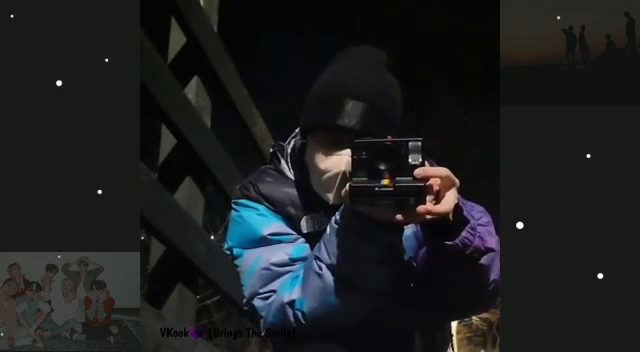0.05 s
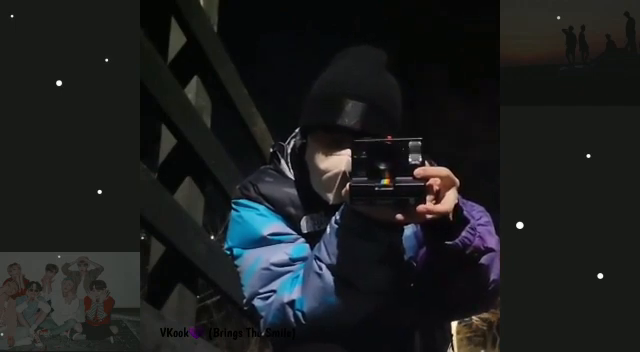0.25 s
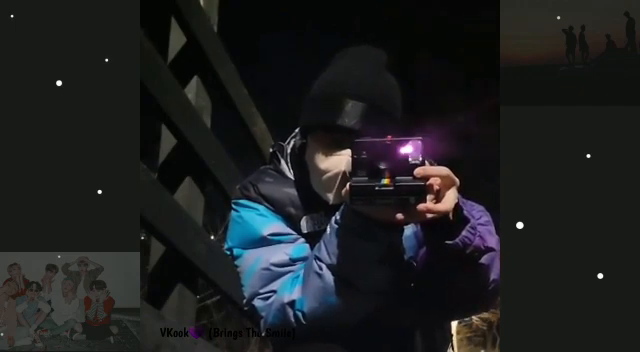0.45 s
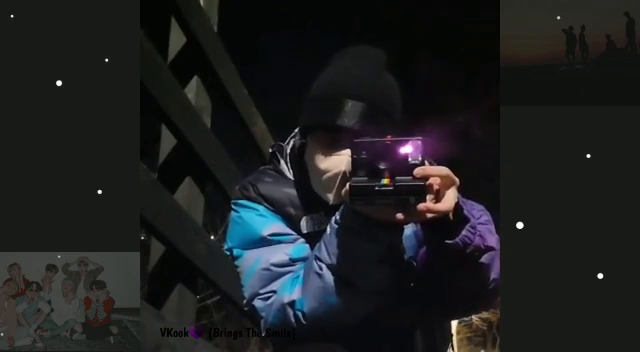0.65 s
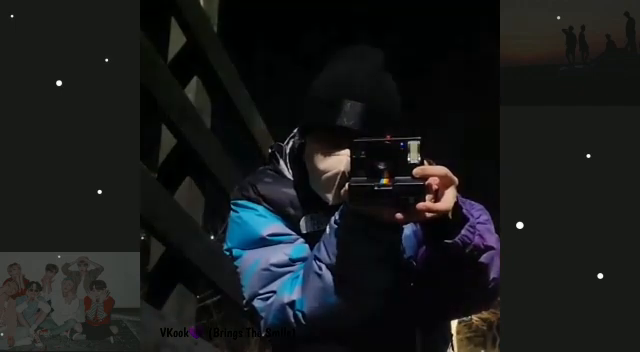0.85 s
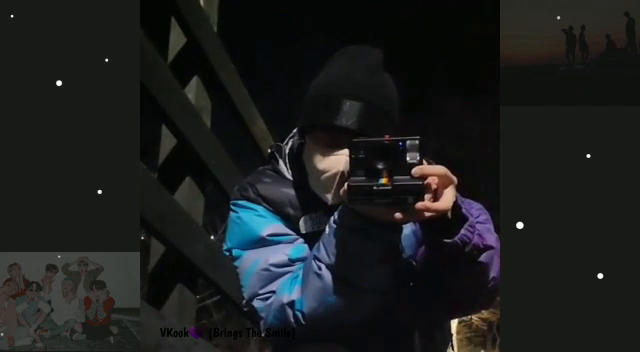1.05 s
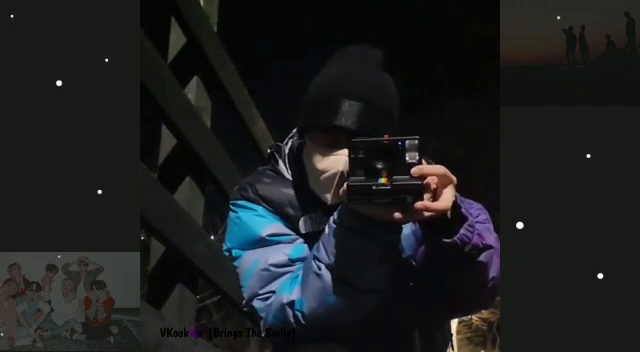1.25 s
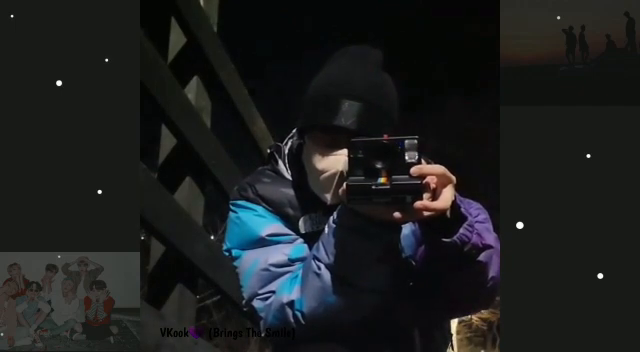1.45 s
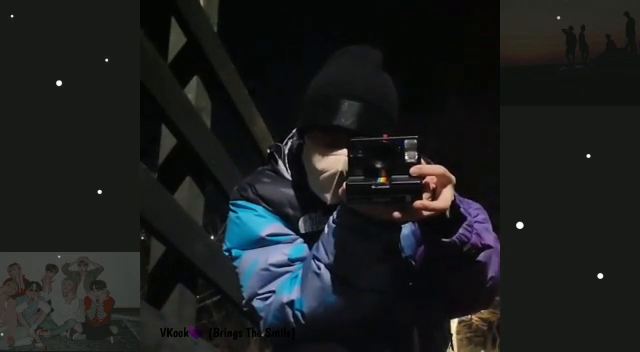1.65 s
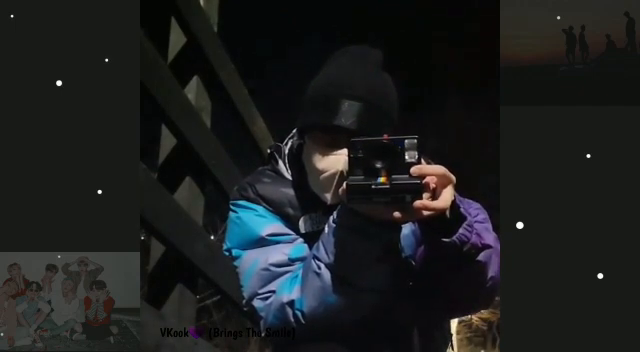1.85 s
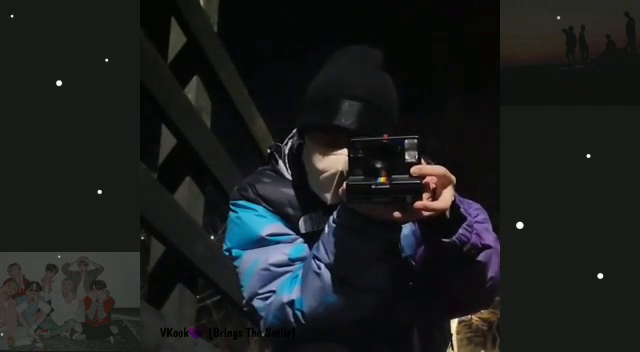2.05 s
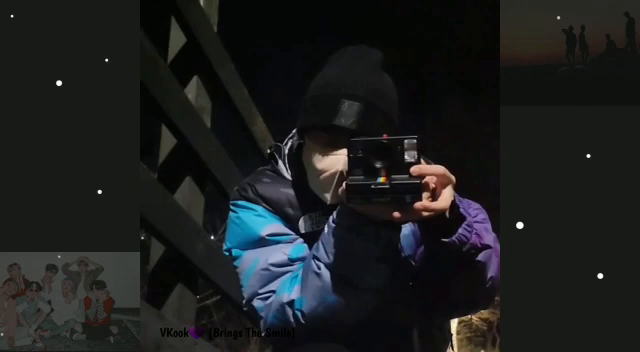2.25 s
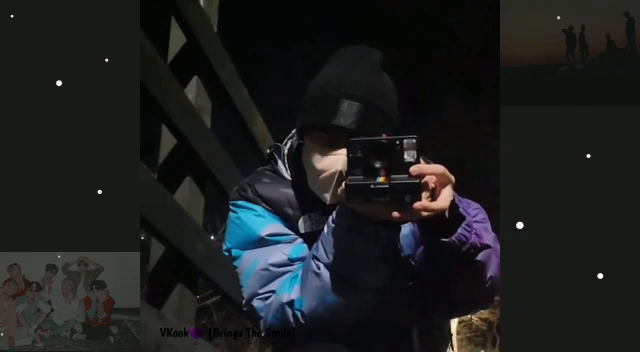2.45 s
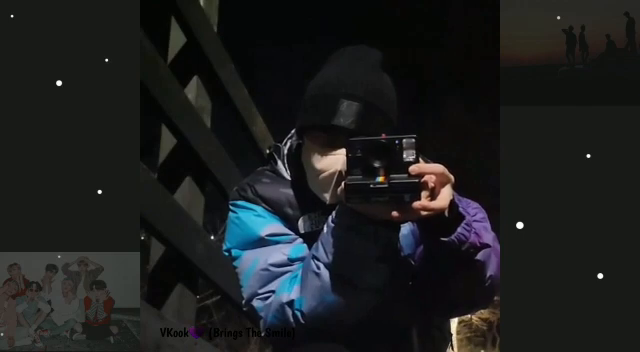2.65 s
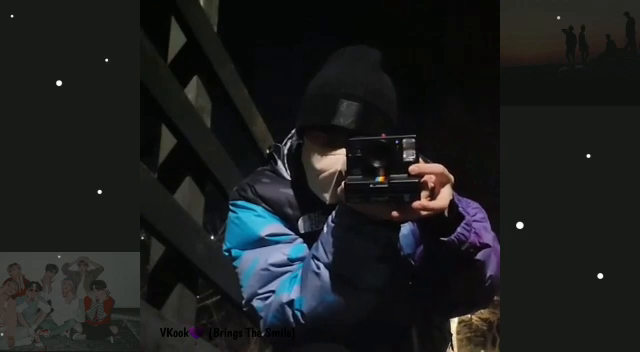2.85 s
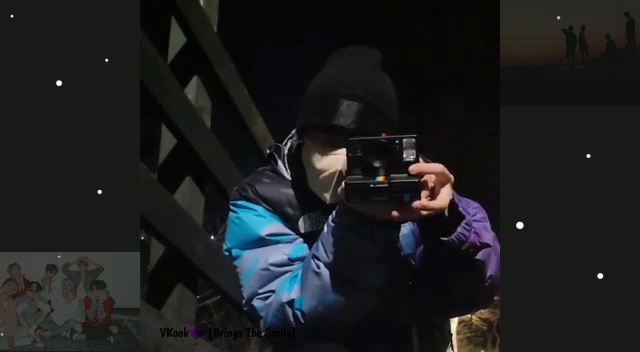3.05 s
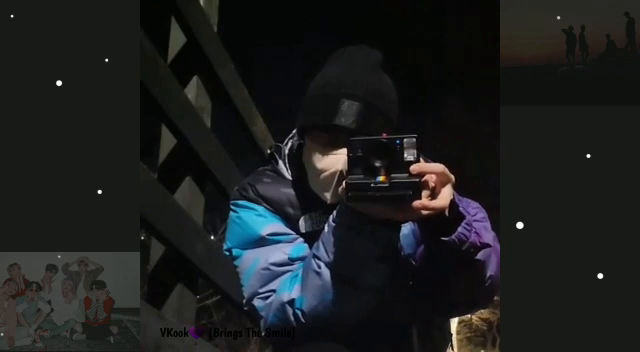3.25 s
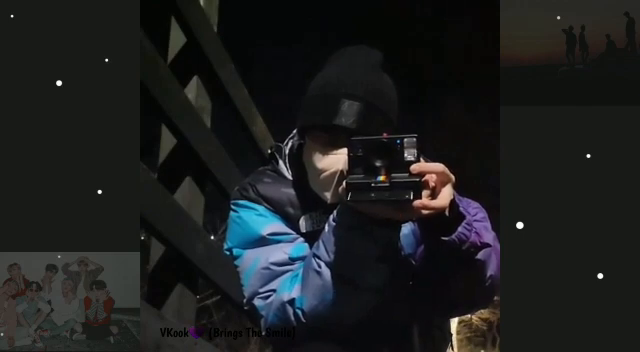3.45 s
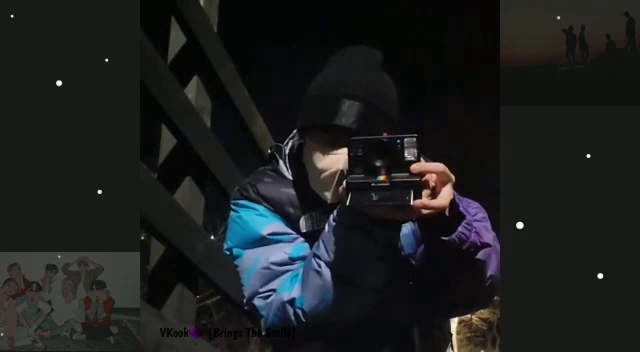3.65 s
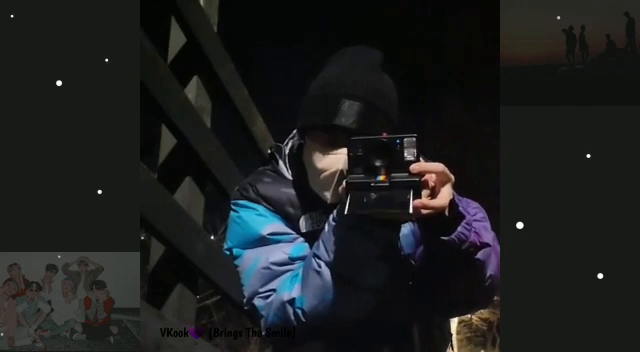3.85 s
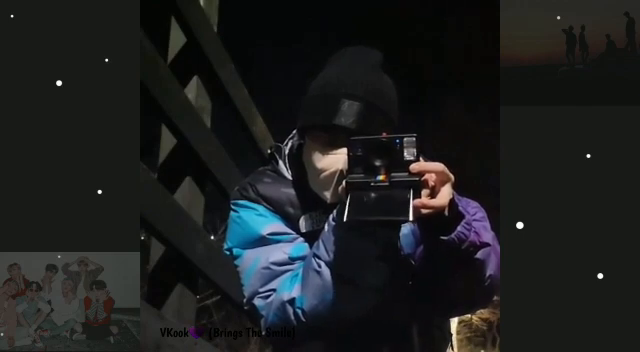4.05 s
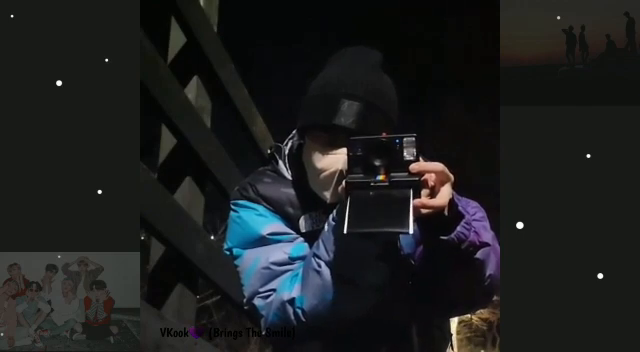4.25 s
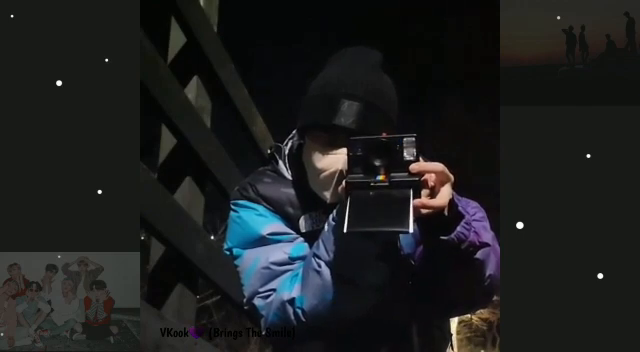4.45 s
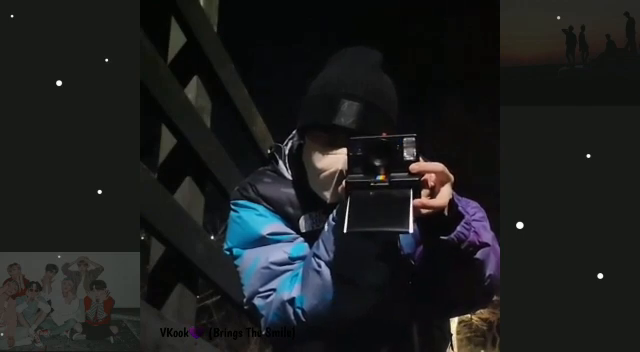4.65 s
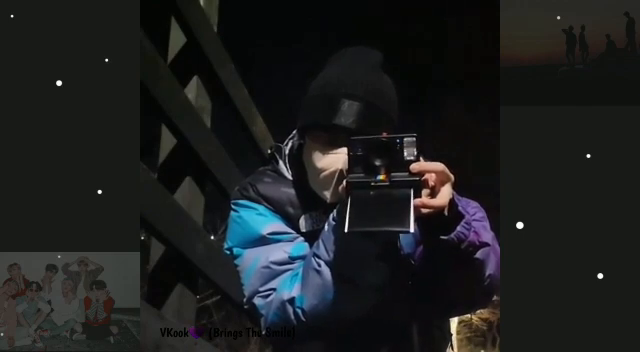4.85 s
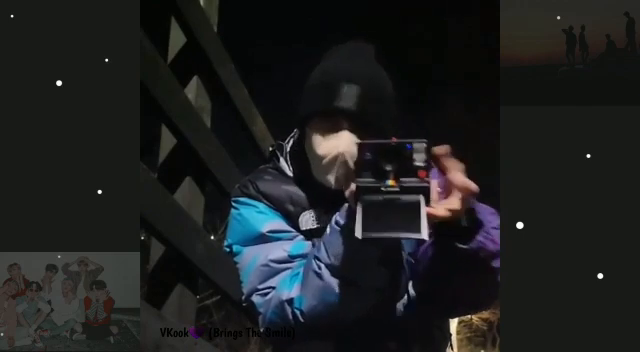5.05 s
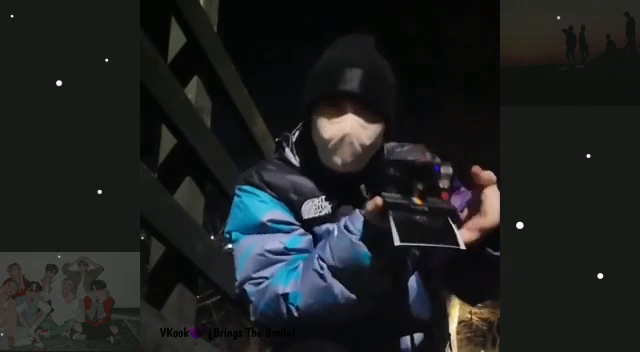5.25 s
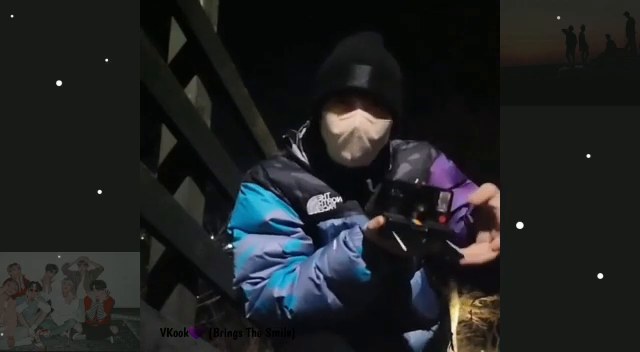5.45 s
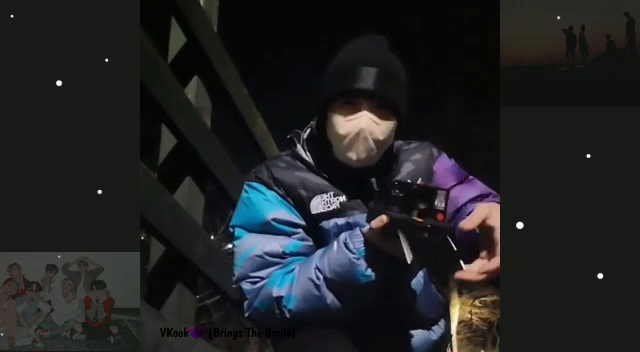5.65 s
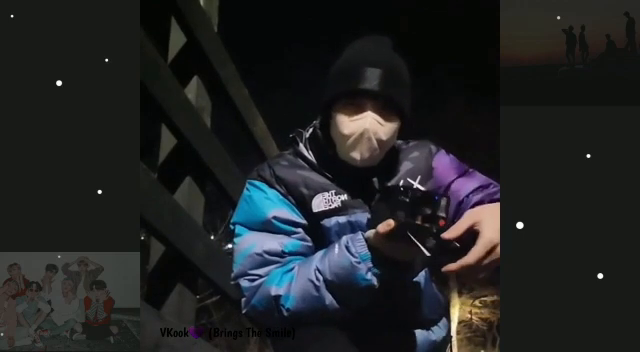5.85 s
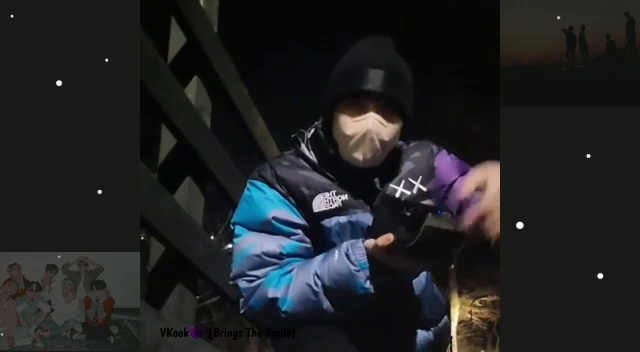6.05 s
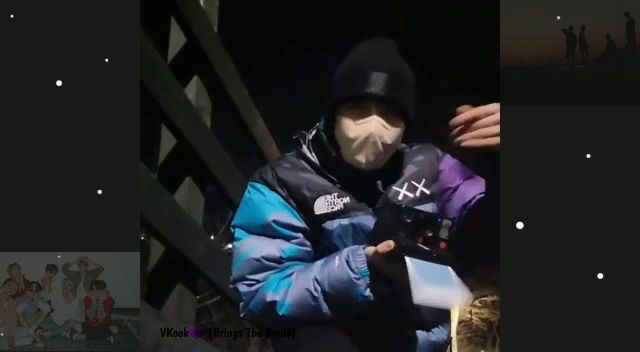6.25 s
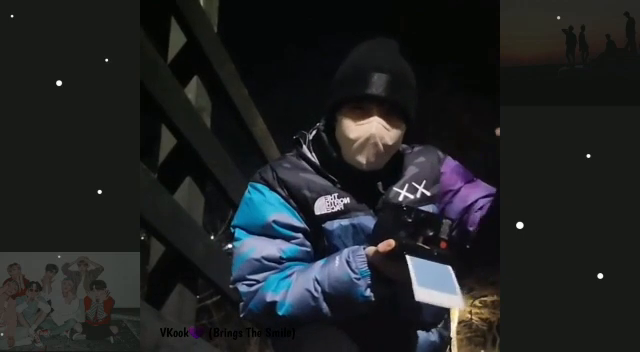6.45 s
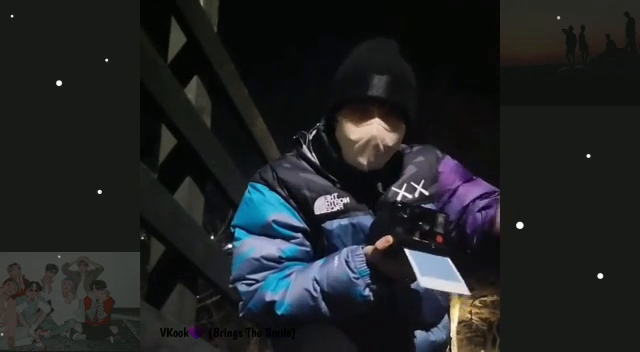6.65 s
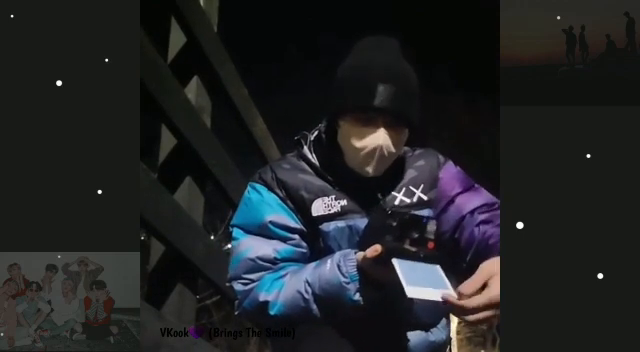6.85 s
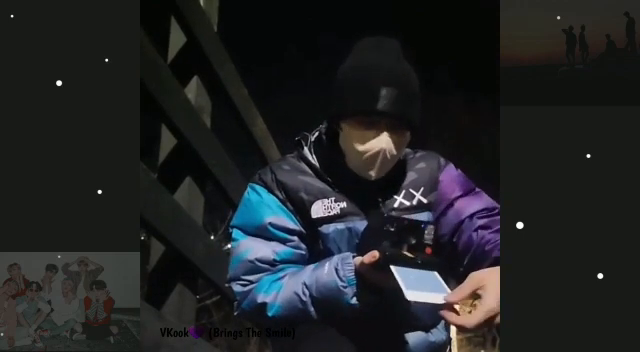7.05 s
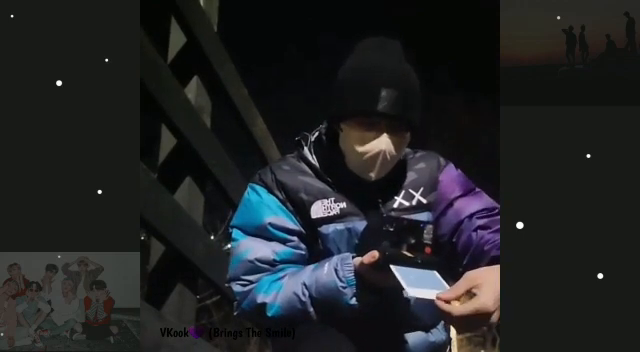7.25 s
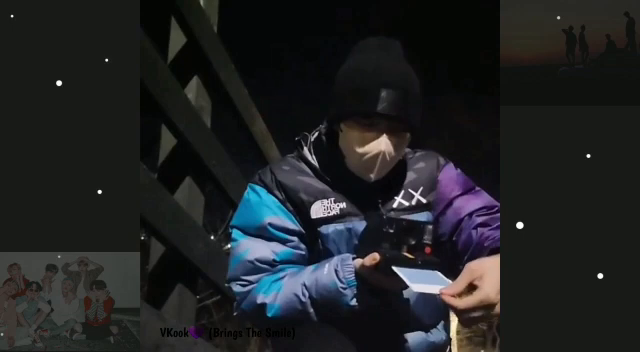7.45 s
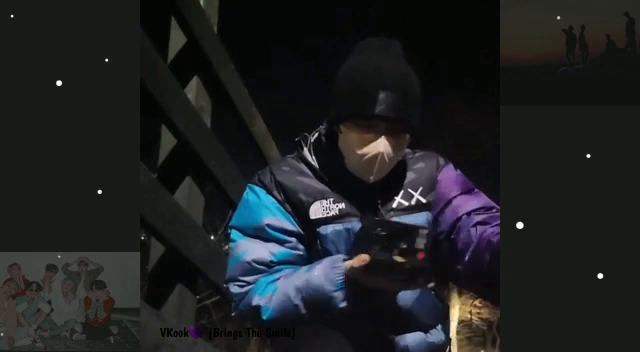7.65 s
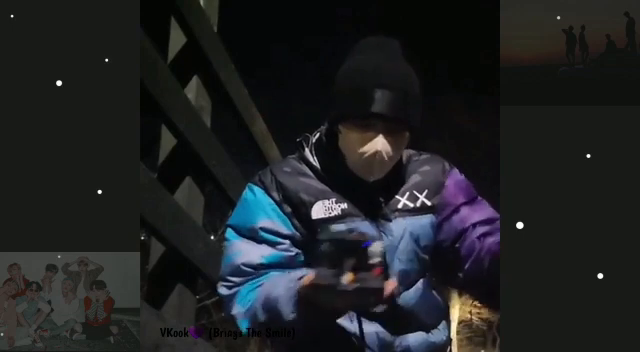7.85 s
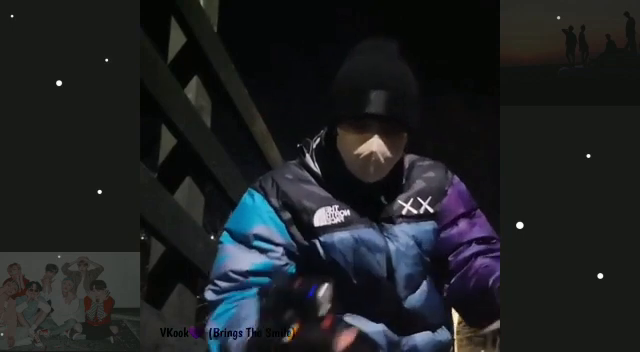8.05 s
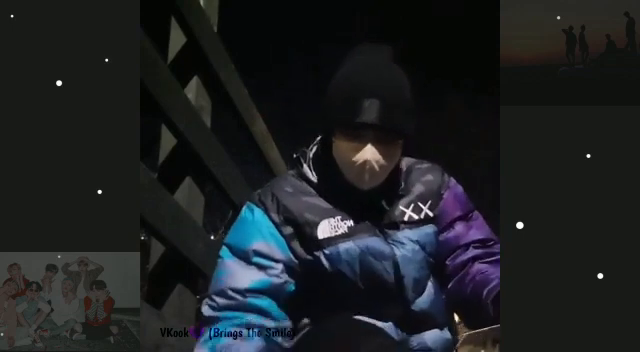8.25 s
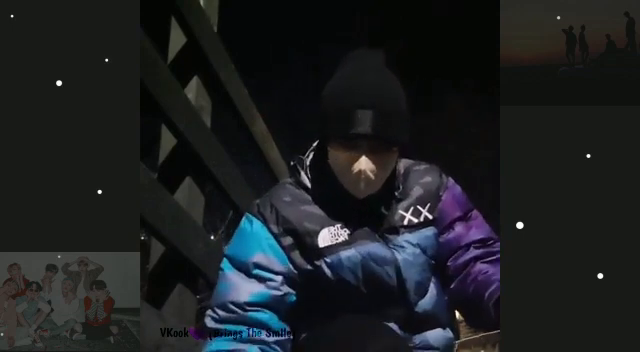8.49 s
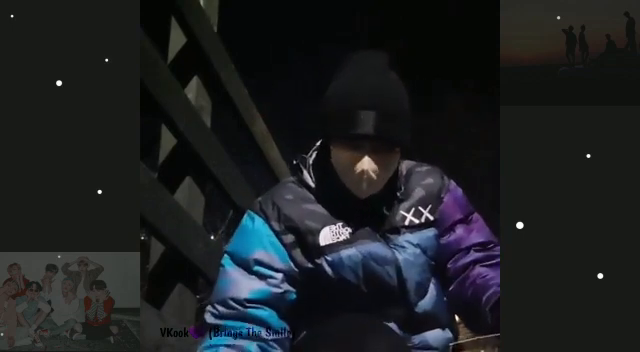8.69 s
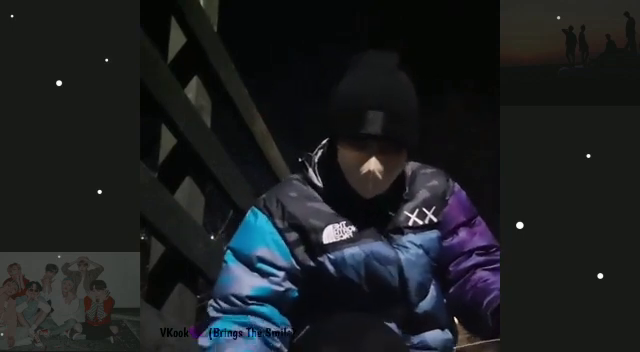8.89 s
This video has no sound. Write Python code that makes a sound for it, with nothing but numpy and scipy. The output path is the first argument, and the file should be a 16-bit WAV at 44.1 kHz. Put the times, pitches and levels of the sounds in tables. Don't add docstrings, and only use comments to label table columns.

```python
import sys
import numpy as np
from scipy import signal
from scipy.fft import rfft, irfft
from scipy.io import wavfile
from scipy.ndimage import uniform_filter1d, map_coordinates

SR = 44100
rng = np.random.default_rng(int(sys.argv[2]) if len(sys.argv) > 2 else 0)


def volts_from_decibels(level):
    exponent = np.asarray(level, float) / 20
    return 10 ** exponent


def output_pcm(signal):
    pcm = np.clip(np.atleast_2d(signal).T, -1, 1) * 32767
    wavfile.write(sys.argv[1], SR, np.round(pcm).astype(np.int16))


N = 393372
T = np.arange(N) / SR
TEETH = 11
# frequency in Hz, density in dB per Hz.
SHELL = [(290, -24), (500, -14), (1460, -13), (1780, -25), (1990, -11.5), (2380, -17), (2630, -28.5),
         (2940, -11), (3280, -5.5), (5900, -12), (6590, -14), (7170, -12.5), (10900, -9.5), (12700, -12),
         (14000, -70.5)]


def motor():
    # time in seconds, tooth-mesh rate in Hz, load 0 to 1.
    spin_free = [(2.15, 1410, 0.6), (2.219, 1883, 0.4), (2.26, 2031, 0.2), (2.362, 2076, 0.54),
                 (2.55, 2107, 0.1), (2.602, 2029, 0.61), (2.975, 1990, 0.67)]
    grip = [(2.999, 1882, 0.95), (3.021, 1545, 0.95), (3.081, 1433, 0.92), (3.15, 1244, 0.72),
            (3.19, 1301, 0.9), (3.227, 1266, 0.75), (3.275, 1399, 0.76), (3.314, 1219, 0.49),
            (3.345, 1370, 0.43)]
    push = [(3.373, 1438, 0.85), (3.501, 1466, 0.9), (3.75, 1518, 0.8), (4.001, 1575, 0.86),
            (4.275, 1668, 0.97), (4.3, 1546, 0.89)]
    coast = [(4.318, 1262, 0.92), (4.333, 1144, 0.85), (4.365, 1390, 0.71), (4.421, 2039, 0.1394),
             (4.462, 2065, 0.087), (4.619, 1890, 0.05), (4.7, 1785, 0.052)]
    s, mesh_points_hz, load_points = np.transpose(spin_free + grip + push + coast)
    mesh_hz = np.interp(T, s, mesh_points_hz)
    load = np.interp(T, s, load_points)

    power_off_s, brake_s, start_s = 4.443, 4.62, 0.047
    start_db = -30 * np.clip(1 - (T - s[0]) / start_s, 0, 1)
    coast_db = -67.5 * np.maximum(T - power_off_s, 0)
    brake_db = -286 * np.maximum(T - brake_s, 0)
    run_db = start_db + coast_db + brake_db
    grind_db = -48.5 + 0.5 * load + run_db

    on = np.clip(np.minimum(T - s[0], s[-1] - T) / 0.019, 0, 1)
    shaft_hz = on * mesh_hz * (1 + 0.0045 * walk(250)) / TEETH
    turn = 2 * np.pi * np.cumsum(shaft_hz) / SR

    whine = mesh_tones(turn, mesh_hz, load, run_db) + shaft_lines(turn, mesh_hz, load, grind_db)
    coasting = np.clip((T - power_off_s) / 0.26, 0, 1)
    # seconds late, gain
    hand_echo = [(0.00046, 0.54), (0.00057, 0.34)]
    sides = [grind(turn, on, load, coasting, grind_db, *echo) for echo in hand_echo]
    return on * (ports(*sides, 10, 0.93, -4.5) + ports(whine, whine, 10, 0, 3.9))


def mesh_tones(turn, mesh_hz, load, run_db):
    # multiple, level in dB unloaded, dB gained at full load.
    mesh = [(2, -70, 26), (3, -60.5, 7), (4, -75, 32)]
    # multiple, level in dB against the 4th.
    mesh_extra = [(1, -17.5), (5, -9), (6, -12), (8, -11)]
    # frequency in Hz, gain in dB.
    radiation = [(2500, -16.5), (3300, -1), (3900, -6), (4650, -18.5), (5800, -3.5), (8200, -8),
                 (11800, -1.5), (13300, -24)]
    tones = [(k, db + load_db * load + run_db) for k, db, load_db in mesh]
    fourth_db = tones[2][1]
    tones += [(k, fourth_db + db) for k, db in mesh_extra]
    whine = 0
    for k, db in tones:
        tone_db = db + np.interp(k * mesh_hz, *np.transpose(radiation)) + 6.5 + 1.1 * walk(40)
        swell = 1 + 0.26 * np.cos(turn + k)
        whine = whine + volts_from_decibels(tone_db) * swell * np.sin(k * TEETH * turn + k * k)
    return whine


def shaft_lines(turn, mesh_hz, load, grind_db):
    # shaft multiple, level in dB when running free.
    wobble = [(6, -11.5), (11, -8), (12, -14), (13, -14), (16, -20), (17, 6), (18, 4), (19, -17), (20, -14),
              (21, -11.5), (23, -5), (25, -21), (31, -23.5)]
    shell_hz, shell_db = np.transpose(SHELL)
    coast_db = np.interp(T, [4.38, 4.5], [0, -9])
    wobble_db = grind_db - 12.5 - 4.5 * load + coast_db
    lines = 0
    for k, db in wobble:
        now_db = np.interp(k * mesh_hz / TEETH, shell_hz, shell_db)
        usual_db = np.interp(k * 184, shell_hz, shell_db)
        line_db = wobble_db + db + 0.6 * (now_db - usual_db) + 3 * walk(18)
        lines = lines + volts_from_decibels(line_db) * np.sin(k * turn + k * k)
    return lines


def grind(turn, on, load, coasting, grind_db, echo_s, echo_gain):
    grit = rng.standard_normal(N) * volts_from_decibels(2.8 * rng.exponential(size=N))
    rattle = colour(on * clatter(turn, 4), SHELL) * np.sqrt(np.mean(on))
    rattle -= 0.6 * band(rattle, 250, 1500)
    rough = volts_from_decibels(-4 * load) * rattle + 0.65 * colour(grit, SHELL)
    late = np.arange(N) - echo_s * SR * (1 + 0.04 * walk(4))
    rough -= echo_gain * np.interp(late, np.arange(N), rough)
    rough += coasting * (1.6 * uniform_filter1d(rough, size=4) - rough)
    return volts_from_decibels(grind_db - 2.5 + 1.5 * walk(30)) * rough


def clatter(turn, turns):
    place = turn / (2 * np.pi)
    rows = int(place[-1] / 2) + 3
    pattern = rng.standard_normal((rows, 192)) * volts_from_decibels(2.88 * rng.exponential(size=(rows, 192)))
    return map_coordinates(pattern, [place / max(turns, 2), place % 1 * 192], order=1, mode="grid-wrap")


def camera_knocks():
    # time in seconds, peak in dB, thud 460-1900 Hz in dB, top 4.9-13.5 kHz in dB, t60 in
    # seconds.
    button = [
        (.974, -61, -5, -3, 0.057),
        (.982, -49.5, -25, -3, 0.053),
        (.989, -56.5, 18, -0.5, 0.015),
        (.9965, -39, 8, -26, 0.014),
        (1.0045, -51.5, -20, 2.5, 0.025),
        (1.049, -45, 16, -8, 0.0059),
        (1.0535, -36, -30, -1, 0.024),
    ]
    latch = [
        (3.1355, -37.5, -11, -8.5, 0.017),
        (3.152, -42, -24.5, -1.5, 0.016),
        (3.1543, -20, -1.5, 3, 0.027),
        (3.1595, -23, -29, -3.5, 0.02),
        (3.177, -31.5, -4.5, -2, .03),
        (3.188, -28.5, -26, -3, 0.0081),
        (3.284, -39.5, 2.5, 0.5, 0.028),
        (3.489, -41, -1.5, -25, 0.033),
    ]
    release = [
        (4.3164, -47, -8, -11.5, 0.025),
        (4.377, -36.5, -31, -1, 0.03),
        (4.3795, -31.5, 0.5, -11, 0.028),
        (4.3855, -40.5, 4.5, -6.5, 0.034),
    ]
    tug = [
        (5.903, -54, 2, 1, 0.026),
        (6.270, -43, -32, -2, 0.081),
        (6.2765, -15, -23.5, -6.5, 0.016),
        (6.2885, -33, 0, -11, 0.044),
        (6.332, -54, -3, -23, 0.048),
    ]
    shut = [
        (7.701, -49.5, 5, 8.5, 0.067),
        (7.708, -40, 8, -3, 0.037),
        (7.7133, -12.5, 0, -6.5, 0.026),
        (7.7165, -22.5, -13, -3, 0.023),
        (7.7225, -33, 8.5, -2.5, 0.031),
        (8.381, -47.5, -12, 1, 0.017),
        (8.59, -68.5, 19.5, -20, 0.15),
    ]
    bump = [
        (8.8763, -45.5, 7.4, -32, 0.018),
        (8.889, -66, 19.2, -1, 0.31),
        (8.9114, -56.5, 1.2, -18, 0.021),
    ]
    # frequency in Hz, level in dB, t60 in seconds.
    button_modes = [(2930, -23, 0.02), (4560, -7, 0.015), (5320, 6.5, 0.012), (7440, -18, 0.021),
                    (8850, -28, 0.041), (12050, 4.5, 0.013)]
    latch_modes = [(1260, 4, 0.13), (2234, -0.5, 0.17), (3130, -22.5, 0.2), (3640, -20, 5.0),
                   (4260, -9, 0.12), (5660, 10, 0.0064), (6960, -14, 0.023), (7460, -21.5, 0.059),
                   (9500, -25.5, 0.028)]
    release_modes = [(846, 5, 0.038), (1233, 0, 0.066), (2360, -2.5, 0.035), (2830, -3, 5.0),
                     (4727, -21.5, 0.079), (5170, -1.5, 0.03), (6180, -19.5, 0.15), (7391, -30, 0.26)]
    tug_modes = [(290, 3.5, 0.045), (770, -18.5, .04), (1500, -25.5, 0.0342), (3200, -30.5, 0.0163),
                 (4640, -17, 0.01533), (6200, 7, 0.037), (7050, 6.5, 0.048), (7900, 6, .012)]
    shut_modes = [(307, -14, .08), (1484, -3.5, 0.05), (777, -17.5, 0.057), (1047, -0.5, 0.018),
                  (1226, -6.5, 0.057), (1890, -5.5, 0.12), (3200, 0.5, 0.017), (4470, 0, 0.0087),
                  (4920, 5.5, 0.0079), (6600, 0.5, 0.02), (7270, 5.5, 0.012)]
    bump_modes = [(290, 15, 5.0), (940, -9, 0.41), (1249, -21, 0.1)]
    out = knocks(button, button_modes, 10.5, pan_db=-5, ring_db=-1, crack_db=-3.5, tail_db=-34, tail_s=0.18)
    out += knocks(latch, latch_modes, 12.5, pan_db=-2.2, ring_db=3, crack_db=0, tail_db=-17.5, tail_s=0.056)
    out += knocks(release, release_modes, 10.5, pan_db=-3, ring_db=-2.5, crack_db=7.5, tail_db=-8, tail_s=0.024)
    out += knocks(tug, tug_modes, 11.5, pan_db=-2.5, ring_db=0.5, crack_db=6, tail_db=-26.5, tail_s=0.23)
    out += knocks(shut, shut_modes, 12.5, pan_db=-3, ring_db=-2, crack_db=-3.5, tail_db=-34.5, tail_s=0.24)
    out += knocks(bump, bump_modes, 13, pan_db=-0.5, ring_db=4.5, crack_db=-2, tail_db=-13, tail_s=0.15)
    return out


def knocks(events, modes, lag, pan_db, ring_db, crack_db, tail_db, tail_s):
    t = T[:16384]
    out = np.zeros((2, N + len(t)))
    peak_mode_db = max(m[1] for m in modes)
    for s, db, low_db, top_db, t60_s in events:
        sides = []
        for side in range(2):
            shape = volts_from_decibels(crack_db - 60 * t / t60_s) + volts_from_decibels(tail_db - 60 * t / tail_s)
            burst = rng.standard_normal(len(t)) * shape * np.minimum(t / 0.0024, 1)
            crack = 1.74 * band(burst, 1500, 6500)
            crack += 2.5 * volts_from_decibels(low_db) * band(burst, 460, 1900)
            crack += 1.5 * volts_from_decibels(top_db) * band(burst, 4900, 13500)
            ring = 0
            for hz, mode_db, mode_t60_s in modes:
                tilt_db = low_db if hz < 1500 else top_db if hz > 6000 else 0
                decay = volts_from_decibels(mode_db + tilt_db - 60 * t / min(mode_t60_s, 1.5 * t60_s))
                ring = ring + decay * np.sin(2 * np.pi * hz * t + side * 7 * rng.random())
            sides.append(crack + volts_from_decibels(ring_db - peak_mode_db) * ring * np.minimum(t / 0.00027, 1))
        i = int(s * SR)
        out[:, i:i + len(t)] += volts_from_decibels(db) * ports(*sides, lag, 0.4, pan_db)
    return out[:, :N]


def jacket():
    # full from in seconds, held in seconds, rustle in dB, brightness in dB, left minus right in dB.
    strokes = [(5.18, 0.13, -83.5, 1, -7), (5.39, 0.3, -70.5, 10, -0.2), (5.8, 0.22, -72, -2, -1.5),
               (6.1, 0.24, -75, 5.5, -0.7), (6.33, 0.026, -73, 4, 1.5), (6.82, 0.05, -89, 11.5, -1),
               (6.94, 0.19, -75.5, 6, -0.7), (7.68, 0.02, -87.5, 10, 0), (7.79, 0.26, -69.5, 3.5, -0.3),
               (8.08, 0.22, -64.5, 1.7, 0), (8.422, 0.13, -69.5, -5, 0), (8.68, 0.17, -70.5, -35, -0.5)]
    # frequency in Hz, density in dB per Hz.
    nylon = [(710, -42), (1200, 1), (2360, -1.5), (2650, -9), (3220, -3), (4520, -7), (5440, -3.5),
             (11900, -9.5), (13300, -16.5), (14000, -62.5)]
    s, held_s, db, bright_db, pan_db = np.transpose(strokes)[:, :, None]
    rise_db = -230 * np.maximum(s - T, 0)
    fall_db = -149.5 * np.maximum(T - s - held_s, 0)
    power = volts_from_decibels(db + rise_db + fall_db) ** 2 + 1e-30
    total = power.sum(axis=0)
    bright_db = (bright_db * power).sum(axis=0) / total
    pan_db = (pan_db * power).sum(axis=0) / total
    flurry = np.sqrt(total) * volts_from_decibels(5 + 1.1 * walk(35))
    sides = []
    for side in range(2):
        slip_db = 3.3 * np.minimum(rng.exponential(size=N), 6.5)
        slips = colour(rng.standard_normal(N) * volts_from_decibels(slip_db), nylon)
        dull = uniform_filter1d(slips, size=3)
        sides.append(flurry * (dull + volts_from_decibels(bright_db + 3.5) * (slips - dull)))
    return ports(*sides, 13.5, 0.85, pan_db)


def traffic():
    # frequency in Hz, density in dB per Hz.
    road = [(20, -31.5), (32, -14.5), (42, -4.5), (52, -2.5), (66, -3), (85, -13), (170, -13), (242, -12.5),
            (310, -18), (600, -27), (950, -31), (1400, -46), (2170, -64), (3000, -71)]
    # from in seconds, to in seconds, level in dB.
    swells = [
        (-0.1, 0.117, 6),
        (2.267, 4.43, 3.5),
        (6.45, 7.296, -3.5),
        (7.91, 8.334, 2),
        (8.786, 9.1, -3),
    ]
    mid = colour(rng.standard_normal(N), road)
    other = colour(rng.standard_normal(N), road)
    swell = walk(1.7)
    rumble = 0
    for hz in 25 * 2.0 ** np.arange(8):
        gain = volts_from_decibels(swell + 1.6 * walk(6.8))
        bass = hz < 130
        share = (hz / 900) ** 2.5 + 0.12 * bass + 0.08
        rumble = rumble + gain * ports(octave(mid, hz), octave(other, hz), 7.6, share, 1.4 * bass)

    def edge(s):
        return 0.5 + 0.5 * np.tanh((T - s) / 0.13 * 2)

    level_db = -59 + sum(db * (edge(a) - edge(b)) for a, b, db in swells)
    return rumble * volts_from_decibels(level_db + 6)


def far_sounds():
    # time in seconds, length in seconds, frequency in Hz, level in dB, overtone step in dB.
    calls = [
        (0.11, 0.16, 243, -46.5, -30),
        (0.255, 0.064, 244, -47, -21),
        (0.18, 0.18, 420, -66, -10),
        (0.42, 0.087, 566, -61, -28),
        (0.45, 0.061, 1701, -71, -32),
    ]
    far = 0
    for s, span_s, hz, db, step_db in calls:
        fade = np.exp(-((T - s) / (span_s / 2)) ** 4)
        for k in range(3):
            far = far + volts_from_decibels(db + k * step_db) * fade * np.sin(2 * np.pi * hz * (k + 1) * T)
    return ports(far, far, 9.2, 0)


def port_hiss():
    # frequency in Hz, density in dB per Hz.
    hiss = [(1500, -9), (2500, -3), (5000, -5), (10000, 0), (12500, -2), (14000, -17.5)]
    return volts_from_decibels(-88) * np.array([colour(rng.standard_normal(N), hiss) for _ in range(2)])


def colour(x, table):
    hz, db = np.transpose(table)
    f = np.log(np.maximum(np.arange(N // 2 + 1) * SR / N, 1))
    y = irfft(rfft(x) * volts_from_decibels(np.interp(f, np.log(hz), db, -120, -120)), N)
    return y / np.sqrt(np.mean(y ** 2))


def band(x, lo_hz, hi_hz):
    return signal.sosfilt(signal.butter(2, [lo_hz, min(hi_hz, 20000)], "band", fs=SR, output="sos"), x)


def octave(x, hz):
    f = np.log2(np.maximum(np.arange(N // 2 + 1) * SR / N, 1) / hz)
    return irfft(rfft(x) * np.cos(np.pi / 2 * np.clip(f, -1, 1)) ** 2, N)


def walk(rate_hz):
    k = int(SR / rate_hz)
    held = np.repeat(rng.standard_normal(N // k + 1), k)
    return 1.3 * uniform_filter1d(uniform_filter1d(held, k), k)[:N]


def ports(x, other, lag, share, pan_db=0.0):
    share = np.clip(share, 0, 1)
    i = np.arange(len(x))
    left = np.interp(i - lag, i, x)
    right = np.sqrt(1 - share) * x + np.sqrt(share) * other
    return np.array([left * volts_from_decibels(pan_db / 2), right * volts_from_decibels(-pan_db / 2)])


def scene():
    return motor() + camera_knocks() + jacket() + traffic() + far_sounds() + port_hiss()


def roll_off(x):
    return signal.sosfilt(signal.butter(12, 13760, fs=SR, output="sos"), x)


def record(dry):
    top = signal.ellip(6, 0.5, 50, 13500, fs=SR, output="sos")
    return roll_off(signal.sosfilt(top, dry))


dry = scene()
out = record(dry)
output_pcm(out)
```